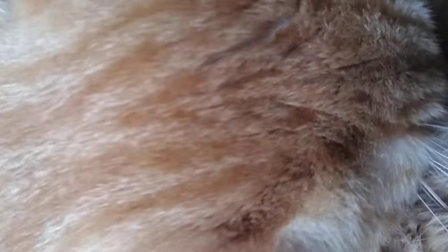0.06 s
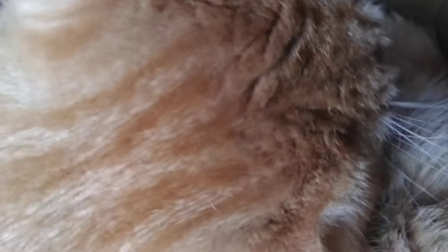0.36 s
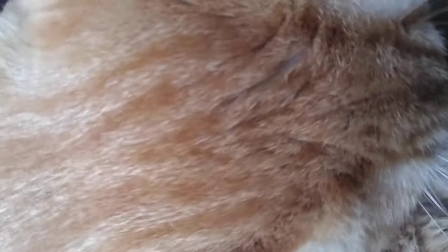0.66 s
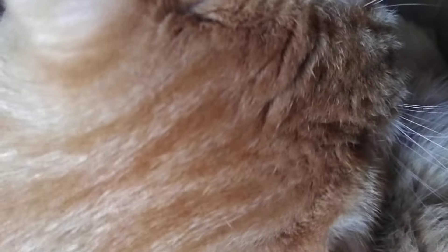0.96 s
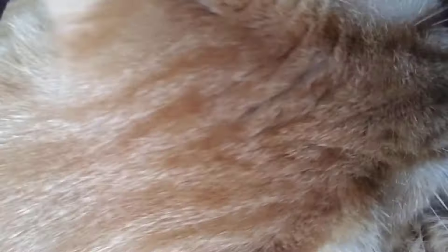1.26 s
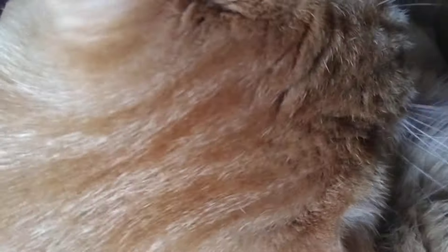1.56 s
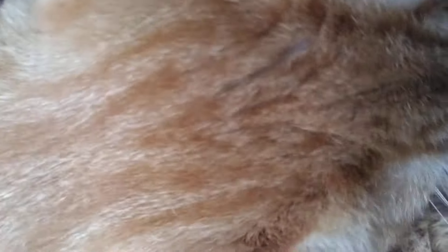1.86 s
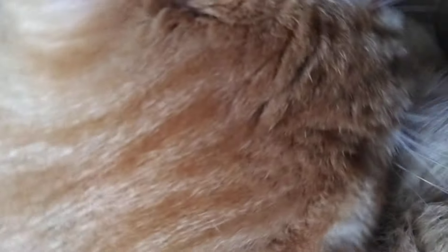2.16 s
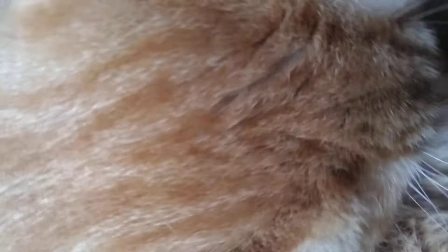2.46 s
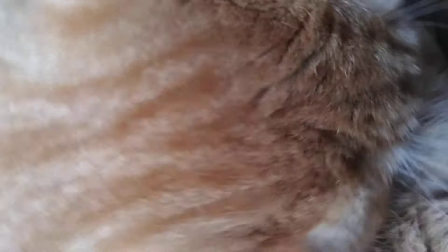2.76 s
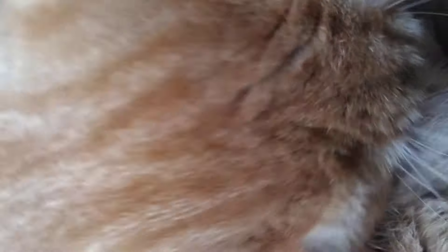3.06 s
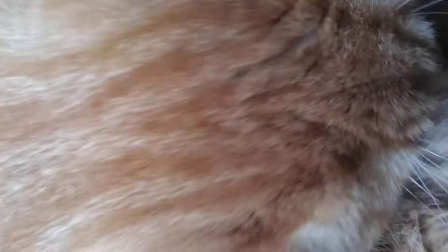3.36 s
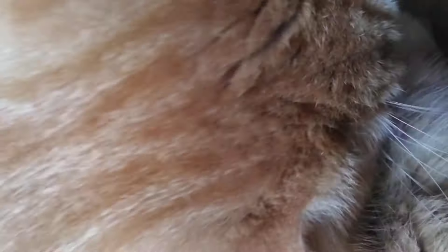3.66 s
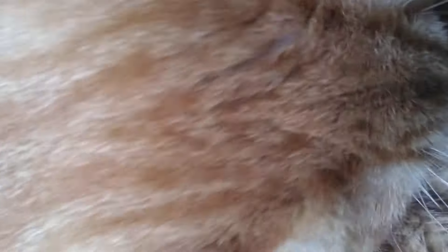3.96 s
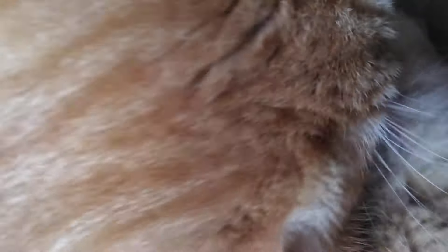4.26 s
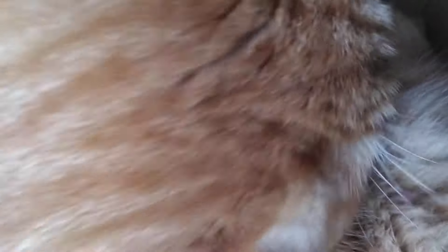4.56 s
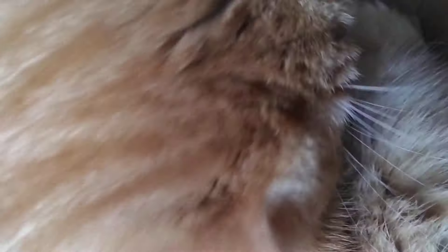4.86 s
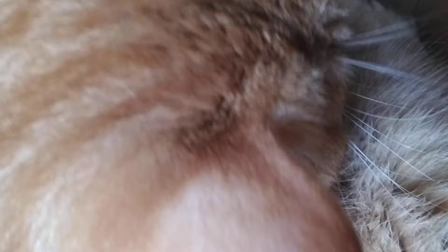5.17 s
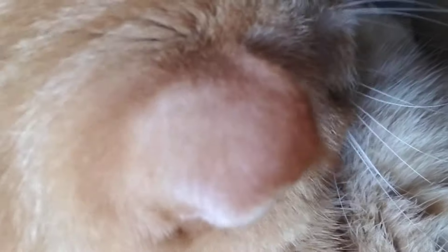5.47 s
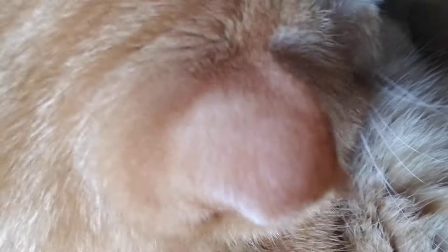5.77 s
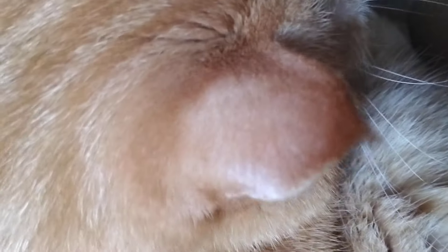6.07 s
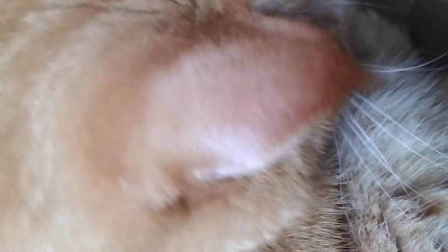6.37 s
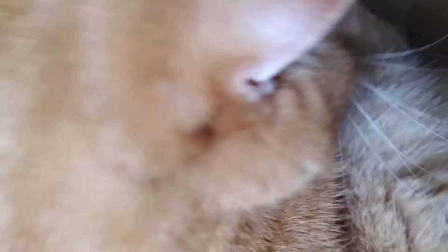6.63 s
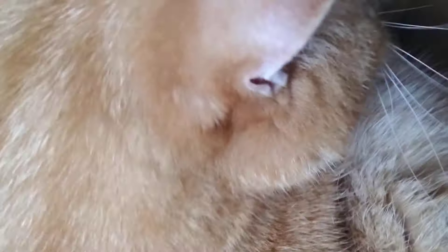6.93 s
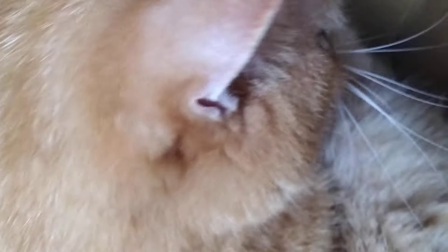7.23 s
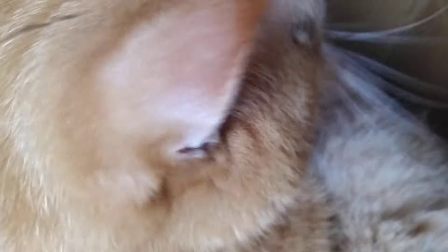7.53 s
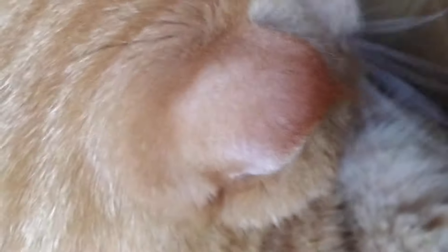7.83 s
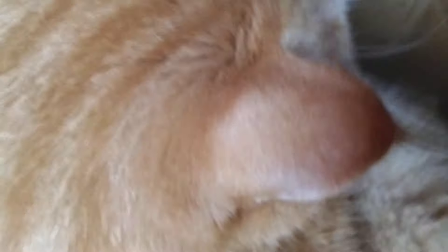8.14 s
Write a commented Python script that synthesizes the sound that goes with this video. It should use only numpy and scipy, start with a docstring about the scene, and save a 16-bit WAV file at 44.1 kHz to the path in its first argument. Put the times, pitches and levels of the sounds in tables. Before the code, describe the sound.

A cat licks its fur up close with soft rasps and wet smacks, then nuzzles its coat as a hand rubs the microphone.

```python
"""A cat washes itself a hand's width from a small camera in a quiet room. For five seconds, nearly twice
a second, a film of saliva bursts with a smack, the barbed tongue rasps through the fur, and the muzzle
brushes back. Then the cat turns its head and nuzzles its coat, fur rubbing on fur, while the hand on the
camera judders by stick-slip friction. Throughout, the microphone ports resonate near 8 kHz, a finger
knocks now and then, and a low rumble and an even hiss lie underneath."""
import sys
import numpy as np
from scipy import signal
from scipy.fft import rfft, irfft
from scipy.io import wavfile
from scipy.ndimage import uniform_filter1d

SR = 44100
rng = np.random.default_rng(int(sys.argv[2]) if len(sys.argv) > 2 else 0)


def dump(signal):
    """Clip the signal to [-1, 1] and save it as 16-bit WAV at the path in sys.argv[1]."""
    limited = np.clip(np.atleast_2d(signal).T, -1, 1)
    pcm = np.round(limited * 32767).astype(np.int16)
    wavfile.write(sys.argv[1], SR, pcm)


N = 370440
TIME = np.arange(N) / SR

# Spectrum of tongue on fur. Each row: frequency in Hz, relative density in dB at left and at right.
TONGUE_SPECTRUM = [(1690, -22.5, -22.5), (2340, -18.5, -22.5), (2830, -22.5, -20.5), (3960, -22, -19),
                   (4520, -15.5, -15.5), (5700, -23, -16.5), (6450, -21, -16.5), (7440, -24, -10),
                   (8060, -5, 1.5), (8740, -10, -2), (9200, -13, -14), (10100, -34, -20),
                   (10600, -18.5, -37), (12500, -29, -27)]
# Resonances of the open mouth. Each row: frequency in Hz, bandwidth in Hz, gain in dB.
OPEN_MOUTH_MODES = [(2340, 110, 3.3), (5600, 260, 3.5)]
# Pulls of the tongue. Each row: start of full contact in seconds, length in seconds, level in dB.
TONGUE_PULLS = [(0.13, 0.15, -57), (0.648, 0.16, -55), (1.319, 0.16, -57), (1.85, 0.17, -54.5),
                (2.392, 0.17, -55), (2.94, 0.15, -55), (3.569, 0.1, -57), (4.171, 0.21, -59.5),
                (4.53, 0.069, -57), (4.867, 0.13, -57.5)]


def licking(chin_db=-70, chin_lifts_s=4):
    """Impulse excitation: hairs snap off the tongue's barbs, tuft after tuft, and ring the open mouth."""
    hairs = stereo(snaps(per_s=1400, spread_db=3), shared=0.55) * undb(1.7 * wander(220))
    rasp = colour_ports(hairs + resonate(hairs, OPEN_MOUTH_MODES), TONGUE_SPECTRUM)
    pull = sum(undb(db) * stroke(start, length, attack_s=0.041, release_s=0.012)
               for start, length, db in TONGUE_PULLS)
    chin_touch = undb(chin_db + 6 * wander(12)) * (TIME < chin_lifts_s)
    return rasp * np.hypot(pull, chin_touch)


# Resonance of the muzzle. Its row: frequency in Hz, bandwidth in Hz, gain in dB.
MUZZLE_MODES = [(5000, 2300, 4)]
# Brushes of the muzzle, mostly between licks. Each row: midpoint in seconds, level in dB.
MUZZLE_BRUSHES = [(0.0, -66), (0.505, -57), (0.95, -64), (1.155, -56.5), (1.69, -57), (2.255, -54),
                  (2.79, -58.5), (3.335, -58.5), (3.875, -54), (4.06, -68), (4.22, -52), (4.82, -59),
                  (5.11, -61)]


def brushing(width_s=0.035):
    """Friction noise: the closed muzzle sweeps back over the fur in short Gaussian swells."""
    hairs = stereo(snaps(per_s=2400, spread_db=3.5), shared=0.61) * undb(1.3 * wander(220))
    sweep = sum(undb(db) * np.exp(-((TIME - middle) / width_s) ** 2) for middle, db in MUZZLE_BRUSHES)
    return colour_ports(hairs + resonate(hairs, MUZZLE_MODES), TONGUE_SPECTRUM) * sweep


# Spectrum of fur on fur. Each row: frequency in Hz, relative density in dB at left and at right.
COAT_SPECTRUM = [(1500, -19.5, -22), (3000, -20.5, -16.5), (4550, -18, -13), (5700, -23, -14),
                 (6700, -12, -4.5), (7290, -20, -2), (7700, -4, 0.5), (8400, -6.5, 2), (9195, -9, -4),
                 (10220, -20, -10.5), (11410, -16, -13), (12700, -28.5, -20)]
# Resonances of the microphone ports. Each row: frequency in Hz, bandwidth in Hz, gain in dB.
PORT_MODES = [(8500, 1030, -7.5), (11100, 12400, -19)]
# Rubs of the head. Each row: start of full contact in seconds, length in seconds, level in dB,
# pressure from 0 (glide) to 1 (scratch).
HEAD_RUBS = [(5.497, 0.12, -67, 0.9), (6.17, 0.052, -61, 0.95), (6.317, 0.31, -59.5, 0.95),
             (6.762, 0.036, -61, 0.85), (7.01, 0.012, -58, 1), (7.3, 0.14, -62.5, 0.54),
             (7.534, 0.41, -50.5, 0.47), (8.034, 0.34, -48.5, 0.72)]


def nuzzling():
    """Dry friction of fur on fur: a light glide rings the ports, a firm push scratches in a wider band."""
    hairs = stereo(snaps(per_s=4000, spread_db=2.5), shared=0.099) * undb(0.83 * wander(120))
    scratch = colour_ports(hairs, COAT_SPECTRUM)
    glide = unit(resonate(scratch, PORT_MODES))
    out = 0
    for start, length, db, pressure in HEAD_RUBS:
        rub = unit(pressure * scratch + (1 - pressure) * glide)
        out += rub * undb(db) * stroke(start, length, attack_s=0.26 * length, release_s=0.035)
    return out * undb(0.74 * wander(14))


# Smacks of the opening mouth. Each row: start in seconds, tick level in dB, lip level in dB,
# lip resonance in Hz, cavity level in dB.
MOUTH_SMACKS = [(0.0993, -51, -52, 4630, -43.5), (1.7936, -37, -40.5, 4800, -38),
                (2.1733, -44, -51.5, 5600, -44), (2.5314, -27, -44, 4800, -41.5),
                (3.2365, -51, -70, 3320, -51), (3.9471, -54, -63, 2710, -44),
                (3.9834, -55, -68, 2610, -46.5), (5.0915, -28.5, -37, 4080, -50),
                (5.4841, -38.5, -49.5, 4530, -43), (5.5274, -56, -48.5, 2430, -49),
                (5.9736, -53, -65, 2410, -47), (6.1523, -35, -43.5, 5570, -42),
                (6.798, -51, -54, 5540, -43.5), (7.6442, -57, -64, 5330, -48),
                (7.7047, -38, -56, 5700, -47), (7.871, -33, -42, 6300, -42), (8.088, -28, -48, 6400, -40)]
# Ticks of saliva on fur. Each row: start in seconds, tick and lip levels in dB, lip resonance in Hz.
SALIVA_TICKS = [(0.1727, -42.5, -59, 5600), (0.6764, -45, -53, 5650), (1.0635, -50, -54, 3830),
                (2.0463, -49, -66, 3230), (2.7237, -49, -64, 6000), (1.3483, -41, -70, 5650),
                (2.3865, -46, -50, 5710), (2.7752, -43, -57, 5640), (2.9723, -41, -52, 5650),
                (3.0096, -40, -51, 4840), (3.7965, -43.5, -50, 6300), (4.3307, -38.5, -53, 3290),
                (4.5474, -32, -43, 6100), (4.8708, -33, -38.5, 6050), (6.2839, -37.5, -53, 5590),
                (8.0676, -34, -44, 6200), (8.1281, -40.5, -40.5, 6850)]


def smacking(tick_pan_db=-4):
    """Transients of bursting saliva: hollow smacks, sharp ticks, and two small ticks per lick or rub."""
    out = np.zeros((2, N))
    for start, tick_db, lips_db, lips_hz, cavity_db in MOUTH_SMACKS:
        add_burst(out, start, tick_db, lips_db, lips_hz, pan_db=6, cavity_db=cavity_db)
    for start, tick_db, lips_db, lips_hz in SALIVA_TICKS:
        add_burst(out, start, tick_db, lips_db, lips_hz, tick_pan_db)
    for start, length, stroke_db, *_ in TONGUE_PULLS + HEAD_RUBS:
        for place, size in rng.random((2, 2)):
            db = stroke_db + 3 * size
            add_burst(out, start + place * length, db + 3, db - 7, lips_hz=5600, pan_db=tick_pan_db)
    return out


# Resonances of the teeth and of the mouth cavity. Each row: frequency in Hz, bandwidth in Hz, gain in dB.
TEETH_MODES = [(3300, 820, -10)]
CAVITY_MODES = [(645, 396, 3), (1030, 190, -2), (1300, 110, -2.5)]


def add_burst(out, start, tick_db, lips_db, lips_hz, pan_db, cavity_db=None, snap_s=0.00071):
    """Free vibration: a saliva film bursts and rings the ports, lips, teeth and, if open, the mouth."""
    t = np.arange(SR // 50) / SR
    noise = stereo(rng.standard_normal((3, len(t))), shared=0.14)
    snap = noise * np.exp(-t / snap_s)
    gap_modes = [(lips_hz, 1170, 0)] + TEETH_MODES
    parts = [(resonate_twice(snap, PORT_MODES), tick_db, pan_db),
             (resonate_twice(snap, gap_modes), lips_db, pan_db)]
    if cavity_db is not None:
        tuning = np.exp(0.03 * rng.standard_normal())
        pop = (t == 0) + 0.04 * noise * np.exp(-t / 0.001)  # one clean release, then a little froth
        parts.append((resonate_twice(pop, CAVITY_MODES, tuning), cavity_db, -7))
    for sound, db, part_pan_db in parts:
        strength = np.sqrt(np.sum(sound ** 2, axis=1, keepdims=True) / (SR / 500))  # rms if 2 ms long
        add(out, start + 0.00055, sound / strength * undb(db) * pan(part_pan_db))


# Saliva squeezed out under the tongue. Each row: start and length in seconds, pitch and bandwidth
# in Hz, level in dB.
SALIVA_SQUELCHES = [(1.14, 0.005, 7800, 2170, -35), (3.362, 0.0073, 2960, 450, -59),
                    (3.786, 0.008, 8000, 1300, -44.5), (4.563, 0.044, 2397, 450, -63),
                    (5.088, 0.033, 4800, 3500, -53), (6.282, 0.0077, 8700, 1500, -45)]


def squelching():
    """Cavity resonance: saliva fizzes briefly in a narrow pocket of the mouth, which sets its pitch."""
    out = np.zeros((2, N))
    for start, length, hz, width_hz, db in SALIVA_SQUELCHES:
        fizz = resonate_twice(rng.standard_normal(SR // 10), [(hz, width_hz, 0)])
        fizz = unit(fizz[-int(length * SR):])
        add(out, start, fizz * np.hanning(len(fizz)) * undb(db) * pan(-9))
    return out


# Finger knocks. Each row: start in seconds, peak level in dB, contact time in seconds.
FINGER_KNOCKS = [(1.272, -33, 0.00051), (2.127, -34, 0.0046), (2.759, -34, 0.0016), (3.986, -38.5, 0.0023),
                 (4.890, -31, 0.00142), (4.922, -27.5, 0.00126), (4.988, -32, 0.00215),
                 (6.285, -29.5, 0.00104), (7.765, -34.5, 0.00044), (8.102, -29, 0.0013),
                 (8.282, -31.5, 0.0024)]
# Slides of the hand. Each row: start of full contact in seconds, length in seconds, level in dB,
# slips per second, contact time in seconds.
HAND_SLIDES = [(6.059, 0.06, -48, 39, 0.001), (6.13, 0.092, -43, 38.4, 0.001),
               (6.355, 0.037, -38.5, 85, 0.001), (6.449, 0.19, -38, 67, 0.0013),
               (6.7, 0.068, -37.5, 66, 0.0012), (6.848, 0.32, -38, 65, 0.0014),
               (7.198, 0.053, -45.5, 116, 0.0023), (7.332, 0.018, -45, 76, 0.0016),
               (7.457, 0.16, -40.5, 78, 0.0022), (7.633, 0.095, -44, 117, 0.0019),
               (7.86, 0.11, -41.5, 71, 0.002), (7.999, 0.11, -41, 86, 0.0021),
               (8.21, 0.12, -48.5, 64, 0.0007)]


def handling(left_db=-13, attack_s=0.02):
    """Stick-slip friction: skin judders on the camera near the right port; at times a finger knocks."""
    out = np.zeros(N)
    for start, db, contact_s in FINGER_KNOCKS:
        add(out, start, bump(contact_s) * undb(db))
    for start, length, db, per_s, contact_s in HAND_SLIDES:
        gap, size, softness = rng.standard_normal((SR // 1000, 3)).T
        times = start - attack_s + np.cumsum(np.exp(0.17 * gap)) / per_s
        contacts = contact_s * np.exp(0.2 * softness)
        slips = np.zeros(N)
        for at, gain, contact in zip(times, undb(2.5 * size), contacts):
            add(slips, at, bump(contact) * gain)
        grip = stroke(start, length, attack_s, release_s=0.029)
        strength = np.sqrt(np.average(slips ** 2, weights=grip ** 2))
        out += slips / strength * undb(db) * grip
    return np.outer([undb(left_db), 1], out)


def bump(contact_s, bass_hz=42):
    """High-pass response: the microphone's weak bass turns a push into a sharp swing and a slow return."""
    u = np.arange(SR // 10) / SR / contact_s
    push = u ** 2 * np.exp(-u)
    swing = signal.sosfilt(signal.butter(2, bass_hz, "high", fs=SR, output="sos"), push)
    return swing / swing.max()


def reflections(x, echo_s=0.0071, echo_db=-21, tail_db=-17, t60_s=0.085):
    """Reverberation: one echo from a near surface, then the exponential decay of a furnished room."""
    t = np.arange(SR // 3) / SR
    response = rng.standard_normal((2, len(t))) * undb(-60 * t / t60_s) * (t > echo_s)
    response *= undb(tail_db) / np.sqrt(np.sum(response ** 2) / 2)
    response[:, int(echo_s * SR)] += undb(echo_db)
    return signal.fftconvolve(x, response, axes=1)[:, :N]


# Spectrum of the background. Each row: frequency in Hz, relative density in dB.
ROOM_SPECTRUM = [(20, -0.5), (55, -7.5), (85, -18.5), (170, -21), (280, -27), (450, -29.5), (900, -35),
                 (2000, -40), (5000, -42), (7200, -42), (8450, -34), (9700, -42), (12000, -43),
                 (15500, -43.5)]


def background(level_db=-46):
    """Partial coherence: both ports share some of the house's rumble; each microphone hisses alone."""
    air = rng.standard_normal((3, N))
    independent = air[1:]
    bass = signal.butter(1, 300, fs=SR, output="sos")
    noise = independent + signal.sosfilt(bass, stereo(air, shared=0.27) - independent)
    return unit(colour(noise, ROOM_SPECTRUM)) * undb(level_db + 0.63 * wander(2.995)) * pan(0.93)


def snaps(per_s, spread_db):
    """Shot noise: three streams of randomly timed impulses of uneven size."""
    hit = rng.random((3, N)) < per_s / SR
    size = undb(spread_db * np.minimum(rng.exponential(size=(3, N)), 4))
    return unit(hit * size * rng.choice([-1, 1], (3, N)))


def wander(per_s):
    """Random modulation: straight ramps between random values, at rms 1."""
    hold = int(SR / per_s)
    steps = np.repeat(rng.standard_normal(N // hold + 1), hold)
    return unit(uniform_filter1d(steps, hold)[:N])


def stroke(start, length, attack_s, release_s):
    """Contact envelope: a linear rise ending at start, a hold, then exponential decay."""
    rise = np.clip(1 + (TIME - start) / attack_s, 0, 1)
    return rise * np.exp(-np.clip((TIME - start - length) / release_s, 0, 20))


def resonate(x, modes, tuning=1):
    """Modal superposition: parallel resonances, all shifted by one factor."""
    out = 0
    for hz, width_hz, db in modes:
        b, a = signal.iirpeak(hz * tuning, hz / width_hz, SR)
        out += undb(db) * signal.lfilter(b, a, x)
    return out


def resonate_twice(x, modes, tuning=1):
    """Cascaded resonance: a second pass sharpens the peaks."""
    return resonate(resonate(x, modes, tuning), modes, tuning)


def colour(x, points):
    """Spectral shaping by (Hz, dB) points, joined on a logarithmic frequency axis."""
    hz, db = np.transpose(points)
    bins_hz = np.maximum(np.arange(N // 2 + 1) * SR / N, 1)
    return irfft(rfft(x) * undb(np.interp(np.log(bins_hz), np.log(hz), db)), N)


def colour_ports(pair, spectrum):
    """Spectral shaping of each port by its own column; rms 1 over both."""
    spectrum = np.array(spectrum)
    return unit(np.array([colour(x, spectrum[:, [0, k]]) for k, x in enumerate(pair, 1)]))


def stereo(three, shared):
    """Partial coherence: the first signal reaches both ports, the other two one each."""
    return np.sqrt(shared) * three[0] + np.sqrt(1 - shared) * three[1:]


def pan(db):
    """Constant-power gains for a level difference, left minus right."""
    gains = undb(np.array([[1], [-1]]) * db / 2)
    return gains / np.sqrt(np.mean(gains ** 2, axis=0))


def add(out, start, sound):
    """Superposition of a short sound at a time in seconds."""
    i = int(np.clip(start * SR, 0, N - 1))
    out[..., i:i + sound.shape[-1]] += sound[..., :N - i]


def undb(db):
    """Decibels to amplitude ratio."""
    return 10 ** (np.asarray(db) / 20)


def unit(x):
    """Normalisation to rms 1."""
    return x / np.sqrt(np.mean(x ** 2))


def scene(left_lag_s=0.000363):
    """Superposition of cat, hand and room; the mouth is to the right, so its sound arrives later at left."""
    left, right = licking() + brushing() + smacking() + squelching()
    left = np.pad(left, (round(left_lag_s * SR), 0))[:N]
    cat = np.array([left, right]) + nuzzling()
    return cat + reflections(cat) + handling() + background()


def record(dry, top_hz=15900):
    """Band limiting: the recorder's steep low-pass filter cuts the highest treble."""
    return signal.sosfilt(signal.ellip(10, 0.2, 70, top_hz, fs=SR, output="sos"), dry)


dry = scene()
out = record(dry)
dump(out)
```